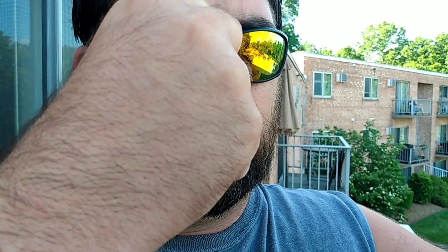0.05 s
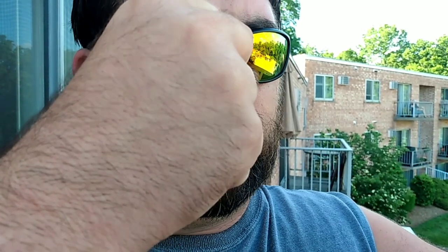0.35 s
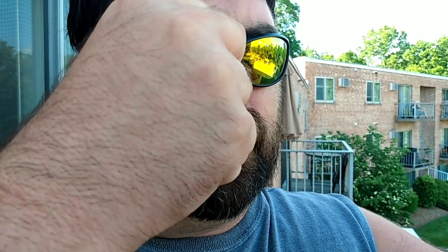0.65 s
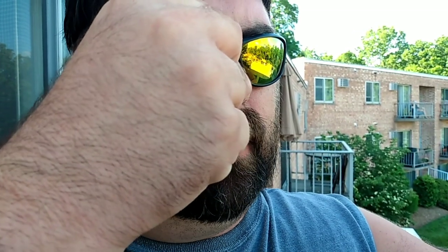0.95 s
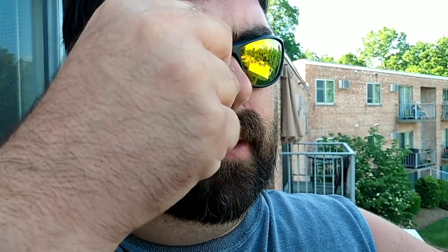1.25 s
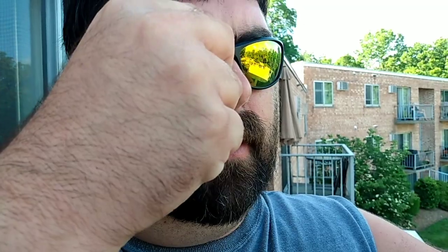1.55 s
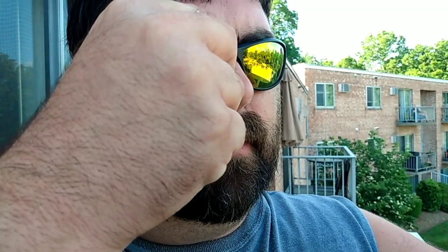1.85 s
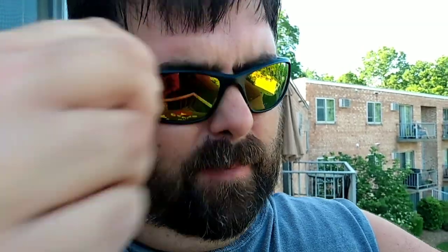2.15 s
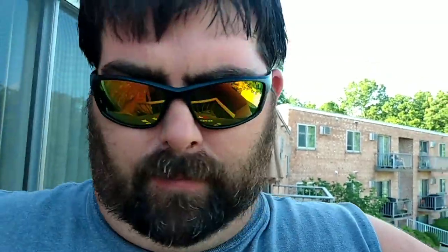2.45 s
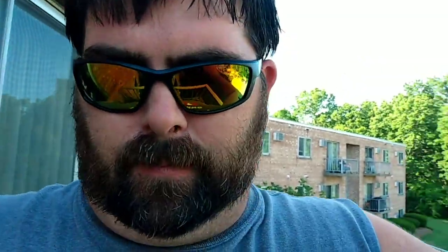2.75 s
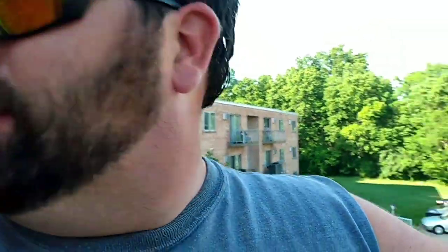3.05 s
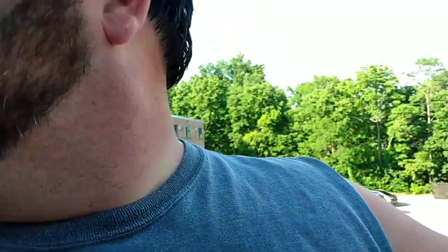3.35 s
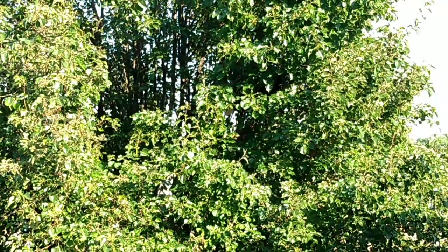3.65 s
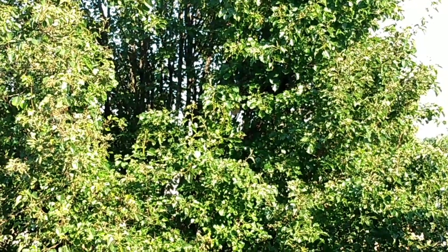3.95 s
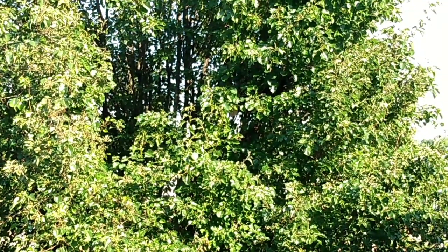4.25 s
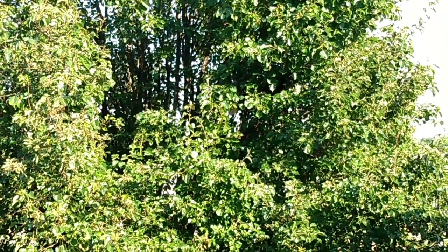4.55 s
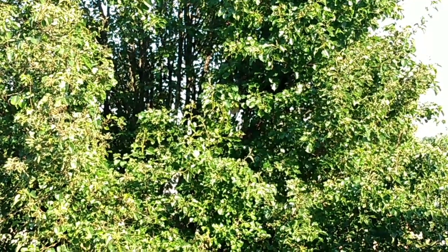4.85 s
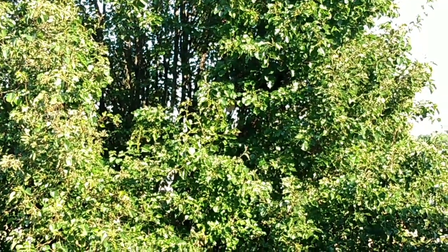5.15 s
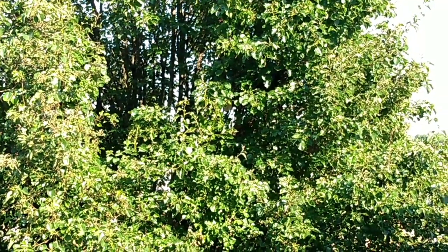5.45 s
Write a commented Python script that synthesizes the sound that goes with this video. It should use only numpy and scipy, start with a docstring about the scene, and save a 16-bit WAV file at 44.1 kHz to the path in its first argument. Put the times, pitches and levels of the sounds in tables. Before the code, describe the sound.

Cicadas drone outdoors over an air conditioner hum while one rasps in bursts up close, then flies past; the chorus swells and ebbs.

```python
"""A cicada chorus drones in the trees round a balcony, over the hum and rush of air conditioners.
Close to the microphone one cicada, probably held in a fist, squawks in stutters, then darts off left.
Each insect clicks by buckling the ribs of its tymbals, and its hollow abdomen rings with every stroke.
The microphone turns from the wall to the trees and the sound cuts out for a moment;
the chorus comes back louder, to the right, and ebbs."""
import sys
import numpy as np
from scipy import signal
from scipy.fft import rfft, irfft
from scipy.io import wavfile

SR = 44100
rng = np.random.default_rng(int(sys.argv[2]) if len(sys.argv) > 2 else 0)


def master_out(mix):
    """Clip the mix to full scale and print it as 16-bit PCM to the path in sys.argv[1]."""
    frames = np.transpose(np.atleast_2d(mix))
    ceiling = np.clip(frames, -1, 1)
    pcm = np.round(ceiling * 32767).astype(np.int16)
    wavfile.write(sys.argv[1], SR, pcm)


N = 252252
TIME = np.arange(N) / SR
BINS = np.maximum(np.fft.rfftfreq(N, 1 / SR), 1)

# The distant chorus, heard by the wall and facing the trees: frequency_hz, level_db
CHORUS_BY_WALL = [(1650, -50), (2800, -30), (3190, -26.5), (3840, -12.5), (4300, -10), (4660, -11.5),
                  (5330, -4.5), (6150, 0), (6520, -2), (7800, -11.5), (8430, -13), (9390, -17.5),
                  (12500, -18.5), (15500, -31.5)]
CHORUS_FACING_TREES = [(1470, -53), (2500, -52), (2950, -35.5), (3470, -18.5), (3750, -13.5), (4710, -9),
                       (6250, -1.5), (6640, -2.5), (7560, -8.5), (8610, -10.5), (9580, -18.5), (12500, -20),
                       (15500, -37.5)]
# Its balance by the wall (every pan is left minus right): frequency_hz, pan_db
WALL_BALANCE = [(3000, 1), (4400, -2), (6200, -1), (8100, -2.5), (12000, 1.5), (15000, -2)]
# It swells to one crest and ebbs: time_s, level_db
CHORUS_SWELL = [(0, -24.5), (1, -24), (2.1, -22), (2.5, -20.5), (3.35, -17.5), (3.7, -15), (4.05, -15.5),
                (4.35, -17), (4.55, -18.5), (5, -23.5), (5.35, -26), (5.7, -28)]
# The microphone turns from the wall (0) to the trees (1): time_s, turn_share
MIC_TURN = [(2.8, 0.085), (3.41, 0.39), (3.58, 0.92)]

# Air conditioner tones: pitch_hz, by_wall_db, facing_trees_db, on_axis_boost_db, waver_db
HUM_TONES = [(119.5, -34, -39.5, 1, 1.45), (225.8, -45.5, -44, 10, 2), (354, -67.5, -55.5, 1, 3),
             (756, -59, -63.5, 4, 4)]
# Fan rumble, then the rush of air from either position: frequency_hz, level_db
FAN_RUMBLE = [(15, -60), (30, -26), (64, -15), (100, -3), (160, -2.5), (220, -0.5), (290, -3.5), (380, -13),
              (480, -20.5), (800, -25.5), (1500, -78)]
RUSH_BY_WALL = [(250, -36), (460, -12), (580, 1.5), (770, 1.5), (900, -4.5), (1100, -12), (1500, -10.5),
                (2000, -14), (2600, -20.5), (3300, -31), (5000, -43)]
RUSH_FACING_TREES = [(250, -18), (480, 2), (700, 3), (1000, -1), (1500, -6), (1900, -17), (2200, -27),
                     (2450, -55), (3500, -68)]

# Squawks of the close cicada: start_s, length_s, level_db
SQUAWKS = [(0.048, 0.08, 0.5), (0.168, 0.023, -1), (0.212, 0.045, 2), (0.266, 0.035, 2), (0.313, 0.3, 0),
           (0.625, 0.13, 0.5), (0.751, 0.09, 1), (0.864, 0.22, 0), (1.101, 0.089, 0.5), (1.195, 0.036, 1.5),
           (1.243, 0.044, 0), (1.297, 0.033, 0.5), (1.357, 0.043, 0.5), (1.409, 0.033, 1.5),
           (1.487, 0.051, -2), (1.544, 0.04, 0.5), (1.592, 0.18, -0.1), (1.792, 0.2, 0),
           (2.135, 0.26, -1.5)]
# Its rasp, in the hand and in flight: frequency_hz, level_db
RASP_HELD = [(2500, -29), (3400, -15), (3900, -11), (4400, -1), (5200, -2.5), (6200, 1), (6800, 2.5),
             (7400, -1), (8400, -4.5), (10100, -10.5), (11000, -14), (13000, -15), (15500, -32)]
RASP_FREED = [(1760, -58), (3000, -24), (3240, -30), (3690, -11), (3950, -13), (4820, -4.5), (6700, -1.5),
              (7900, -4), (9100, -6.5), (10200, -5), (11500, -15), (13800, -16), (15500, -26)]
# Its voice follows the grip: time_s, rasp_db, hollow_db, ring_db, ring_start_hz
GRIP = [(0.08, -24, -6, -28, 6950), (0.33, -25, 1, -30, 6900), (0.52, -24.5, 4.5, -26.5, 6540),
        (0.75, -25.5, 5.5, -25.5, 6510), (1.02, -25, 9, -24.5, 6540), (1.16, -22.5, -1, -22, 6530),
        (1.42, -23.5, -2, -21, 6567), (1.65, -22.3, 2.5, -20.5, 6545), (1.95, -20.5, -1.5, -21.5, 6640)]
# Hollows of the loosening fist: first_hz, release_hz, width_hz, relative_db, pan_db
FIST_HOLLOWS = [(6800, 5400, 330, -5, 12), (7800, 8100, 220, -1, 2), (8900, 9750, 330, 8, -9),
                (9850, 10460, 390, 7, 4), (11750, 11500, 600, 6, 17), (12700, 13100, 350, 3, 9)]
# Single strokes as it passes the microphone: start_s, level_db
CHIRPS = [(2.279, -13), (2.303, -16), (2.312, -17), (2.322, -13.5), (2.350, -9), (2.366, -11.5),
          (2.372, -12), (2.378, -12), (2.39, -13.5), (2.397, -8.5)]
# The crackle in those strokes: frequency_hz, level_db
CHIRP_CRACKLE = [(2500, -41), (4500, 0.5), (7000, -5), (10500, -1.5), (13500, -8), (15500, -16)]

ARM_DROPS_S, FREED_S = 1.78, 2.02
FANS_ON_AXIS_S, ON_AXIS_WIDTH_S = 3.33, 0.11  # mid-turn, the microphone points at the fans
SILENT_FROM_S, SILENT_TO_S = 3.418, 3.516


def from_db(db):
    """Decibels to gain."""
    return 10 ** (np.asarray(db) / 20)


def rms_one(x):
    """Scale every channel to rms 1."""
    return x / np.sqrt(np.mean(x ** 2, axis=-1, keepdims=True) + 1e-20)


def in_time(rows):
    """Each column of a timed table at every sample."""
    time_s, *columns = np.transpose(rows)
    return [np.interp(TIME, time_s, column) for column in columns]


def at_bins(points):
    """A table over frequency at every bin."""
    hz, value = np.transpose(points)
    return np.interp(np.log(BINS), np.log(hz), value)


def colour(x, spectrum):
    """Filter a signal by a spectrum; rms 1."""
    return rms_one(irfft(rfft(x) * from_db(at_bins(spectrum)), N))


def drift(rate_hz):
    """A random wander of spread 1, with rate_hz turning points a second."""
    knots = rng.standard_normal(2000)
    return np.interp(TIME * rate_hz, np.arange(len(knots)), knots) * np.sqrt(3 / 2)


def bump(centre_s, width_s):
    """A bell curve of height 1 in time."""
    return np.exp(-((TIME - centre_s) / width_s) ** 2)


def placed(level_db, pan_db):
    """Left and right gains; panning keeps the total power."""
    sides = from_db(np.array([pan_db, -pan_db]) / 2)
    return from_db(level_db) * sides / np.sqrt(np.mean(sides ** 2, axis=0))


def stereo_pair(x, lead_s):
    """Sound reaches the left of the microphone first when the lead is positive."""
    return np.array([x, np.interp(TIME - lead_s, TIME, x)])


def turning(at_wall, at_trees):
    """A value that follows the turn of the microphone."""
    turn, = in_time(MIC_TURN)
    return at_wall + (at_trees - at_wall) * turn


def tymbal_cycle(rate_hz, wander=.04, jitter=.08):
    """How far the drumming muscle is through its stroke, 0-1."""
    speed_hz = rate_hz * (1 + wander * drift(6) + jitter * drift(150))
    return (rng.random() + np.cumsum(speed_hz) / SR) % 1


def rib_clicks(cycle, duty, uneven_db, ribs):
    """Each stroke buckles a row of ribs, one click apiece, and then rests."""
    rib = np.floor(np.minimum(cycle / duty, 1) * ribs)
    buckles = np.flatnonzero(np.diff(rib) > 0)
    clicks = np.zeros(N)
    clicks[buckles] = from_db(uneven_db * rng.standard_normal(len(buckles)))
    return clicks


def scatter(x, decay_s, size=2048):
    """Leaves and walls smear each click into a short burst, different on each side."""
    echoes = rng.standard_normal((2, size)) * np.exp(-np.arange(size) / SR / decay_s)
    return rms_one(signal.oaconvolve(x[None], echoes, axes=1)[:, :N])


def belly_ring(cycle, start_hz, fall_hz=900, spread_hz=90, uneven_db=3.5):
    """The hollow abdomen rings once a stroke, falling in pitch as rib after rib gives way."""
    pitch_hz = start_hz - fall_hz * cycle + spread_hz * drift(300)
    swell = np.sin(np.pi * cycle) ** 2 * from_db(uneven_db * np.tanh(drift(150)))
    return rms_one(swell * np.sin(2 * np.pi * np.cumsum(pitch_hz) / SR))


def nearest_singers(slow_hz=150, fast_hz=230, shielded_db=-7, count=4):
    """A few males ring shrilly in the nearest tree; a raised arm shields the microphone at first."""
    singers = 0
    for rate_hz in np.geomspace(slow_hz, fast_hz, count):
        ring = belly_ring(tymbal_cycle(rate_hz), start_hz=6667, spread_hz=170.1)
        singers += scatter(ring, decay_s=.00095) * from_db(1.7 * drift(2.84))
    return rms_one(singers) * from_db(np.where(TIME < ARM_DROPS_S, shielded_db, 0))


def chorus(facing_trees, slow_hz=150, fast_hz=420, count=8, flutter_db=0.6, ebb_s=(4.3, 5.7)):
    """Each singer buzzes at its own rate; thousands farther off merge into a hiss as the buzz ebbs."""
    singers = 0
    for rate_hz in np.geomspace(slow_hz, fast_hz, count):
        clicks = rib_clicks(tymbal_cycle(rate_hz), duty=.3, uneven_db=3, ribs=2)
        singers += scatter(clicks, decay_s=.0023) * from_db(2 * drift(3.06))
    buzz = rms_one(singers) * from_db(np.interp(TIME, ebb_s, [-5.5, -8.5]))
    hiss = rng.standard_normal((2, N))
    crowd = (hiss + buzz) * from_db(flutter_db * drift(110))
    by_wall = irfft(rfft(crowd) * from_db(at_bins(WALL_BALANCE) * [[.5], [-.5]]), N)
    song = np.where(facing_trees, colour(crowd, CHORUS_FACING_TREES), colour(by_wall, CHORUS_BY_WALL))
    song += nearest_singers() * placed(level_db=-6, pan_db=-11)[:, None]
    level_db, = in_time(CHORUS_SWELL)
    # The chorus moves right as the arm drops and the microphone turns.
    pan_db = turning(at_wall=np.where(TIME < ARM_DROPS_S, 0, -1.5), at_trees=-3)
    return song * placed(level_db, pan_db)


def air_conditioners(facing_trees):
    """Mains hum and fan tones waver a little and stand out as the microphone points at them."""
    on_axis = bump(FANS_ON_AXIS_S, ON_AXIS_WIDTH_S)
    hum = 0
    for pitch_hz, wall_db, trees_db, boost_db, waver_db in HUM_TONES:
        level_db = np.where(facing_trees, trees_db, wall_db) + boost_db * on_axis + waver_db * drift(17)
        phase = 2 * np.pi * pitch_hz * TIME + 0.13 * drift(5.6)
        hum += np.sqrt(2) * from_db(level_db) * np.sin(phase)
    return hum


def fans(facing_trees, side_db=-14, flutter_db=1.08, on_axis_db=1.3):
    """A fluttering rumble sits near the centre; rushing air arrives from one side and off the walls."""
    mid, side, air = rng.standard_normal((3, N))
    rumble = colour(mid + from_db(side_db) * side * [[1], [-1]], FAN_RUMBLE)
    direct = stereo_pair(air, lead_s=turning(at_wall=.00051, at_trees=-.00048))
    diffuse_gain = from_db(np.where(facing_trees, -2, -10))
    airflow = (direct + diffuse_gain * rng.standard_normal((2, N))) / np.hypot(1, diffuse_gain)
    rush = np.where(facing_trees, colour(airflow, RUSH_FACING_TREES), colour(airflow, RUSH_BY_WALL))
    rumble_db = np.where(facing_trees, -39, -37.5) + flutter_db * drift(28)
    rush_db = np.where(facing_trees, -46, -40)
    boost = from_db(on_axis_db * bump(FANS_ON_AXIS_S, ON_AXIS_WIDTH_S))
    return (rumble * from_db(rumble_db) + rush * from_db(rush_db)) * boost


def tymbal_rasp(cycle, crackle_s=.0016):
    """At close range every buckling rib crackles for a moment."""
    clicks = rib_clicks(cycle, duty=.88, uneven_db=1.5, ribs=8)
    envelope = signal.lfilter([1], [1, -np.exp(-1 / (SR * crackle_s))], clicks)
    return envelope * np.tanh(rng.standard_normal(N))


def beside_wall(x, wall_db):
    """A close sound reaches the microphone directly and, smeared, off the wall."""
    reflection = from_db(wall_db) * np.std(x) * scatter(x, decay_s=.0072)
    return stereo_pair(x, lead_s=.00019) + reflection


def through_fist(x, hollow_db):
    """The hollows of the hand add gliding resonances, each stronger on one side; rms 1."""
    out = x
    for first_hz, release_hz, width_hz, relative_db, pan_db in FIST_HOLLOWS:
        pitch_hz = np.interp(TIME, [0, FREED_S], [first_hz, release_hz])
        carrier = np.exp(2j * np.pi * np.cumsum(pitch_hz) / SR)
        pole = np.exp(-np.pi * width_hz / SR)
        ringing = np.real(carrier * signal.lfilter([1 - pole], [1, -pole], x / carrier))
        out = out + ringing * from_db(hollow_db) * placed(relative_db, pan_db)[:, None]
    return rms_one(out)


def stutter(pause_db, edge_s=.0092):
    """Squawks start and stop abruptly; between them the insect ticks over faintly while held."""
    gain = from_db(pause_db) * (TIME < FREED_S)
    for start_s, length_s, level_db in SQUAWKS:
        inside_s = np.minimum(TIME - start_s, start_s + length_s - TIME)
        gain = np.maximum(gain, from_db(level_db) * np.clip(inside_s / edge_s + .5, 0, 1))
    return gain


def held_cicada(rate_hz=180):
    """In a fist close by: a broad rasp over the belly's shrill ring, uneven as the insect struggles."""
    cycle = tymbal_cycle(rate_hz, wander=.075, jitter=.12)
    rasp_db, hollow_db, ring_db, ring_start_hz = in_time(GRIP)
    pan_db = 1.5 - TIME  # slips from left to right, 1 dB a second
    rasp = colour(tymbal_rasp(cycle), RASP_HELD)
    rasp = through_fist(beside_wall(rasp, wall_db=-2.5), hollow_db)
    ring = beside_wall(belly_ring(cycle, ring_start_hz, fall_hz=542, uneven_db=1.1), wall_db=-8)
    rasp *= stutter(pause_db=-14) * placed(rasp_db, pan_db + 2)
    ring *= stutter(pause_db=-20) * placed(ring_db, pan_db - 2)
    return (rasp + ring) * (TIME < FREED_S)


def freed_cicada(rate_hz=170, ring_db=-5, pass_s=2.37, approach_db_per_s=10.5):
    """One last squawk, mostly rasp, swells as the insect flies past the left of the microphone."""
    cycle = tymbal_cycle(rate_hz, wander=.025, jitter=.07)
    rasp = colour(tymbal_rasp(cycle), RASP_FREED)
    ring = from_db(ring_db) * belly_ring(cycle, start_hz=7300, fall_hz=1493)
    squawk = beside_wall(rasp + ring, wall_db=-0.5) * stutter(pause_db=-16) * (TIME > FREED_S)
    passing = bump(pass_s, width_s=.06)
    level_db = -24 + approach_db_per_s * (TIME - pass_s) + 5 * passing
    return squawk * placed(level_db, pan_db=5 + 16 * passing)


def passing_chirps(length_s=.0062, start_hz=8000, fall_hz=2400, crackle_db=-8.5):
    """Right at the microphone single strokes stand out, each a crackle and a quick downward sweep."""
    crackle = from_db(crackle_db) * colour(rng.standard_normal(N), CHIRP_CRACKLE)
    chirps = 0
    for start_s, level_db in CHIRPS:
        progress = np.clip((TIME - start_s) / length_s, 0, 1)
        sweep = np.sin(2 * np.pi * np.cumsum(start_hz - fall_hz * progress) / SR)
        chirps += from_db(level_db) * np.sin(np.pi * progress) * (sweep + crackle)
    return beside_wall(chirps, wall_db=-26) * placed(level_db=0, pan_db=15)[:, None]


def scene():
    """On the balcony: the microphone is first beside the wall, then facing the trees."""
    facing_trees = TIME > SILENT_TO_S
    ambience = chorus(facing_trees) + air_conditioners(facing_trees) + fans(facing_trees)
    return ambience + held_cicada() + freed_cicada() + passing_chirps()


def record(dry, close_s=.012, open_s=.002, dip_db=-12, recovery_s=.082, peak=.95, cutoff_hz=15800):
    """The sound cuts out briefly and fades back in; rare peaks are clipped and the top is cut."""
    closing = (SILENT_FROM_S - TIME) / close_s
    opening = (TIME - SILENT_TO_S) / open_s
    gate = np.clip(np.maximum(closing, opening) + .5, 0, 1)
    since_return_s = np.maximum(TIME - SILENT_TO_S, 0)
    fade_db = dip_db * np.exp(-since_return_s / recovery_s) * (TIME > SILENT_TO_S - open_s)
    low_pass = signal.ellip(12, .1, 90, cutoff_hz, fs=SR, output="sos")
    return signal.sosfilt(low_pass, np.clip(dry * gate * from_db(fade_db), -peak, peak))


dry = scene()
out = record(dry)
master_out(out)
```